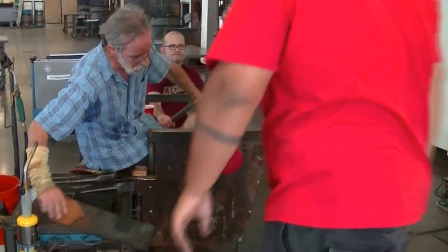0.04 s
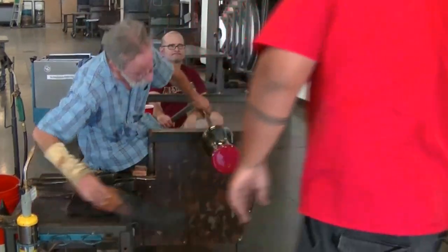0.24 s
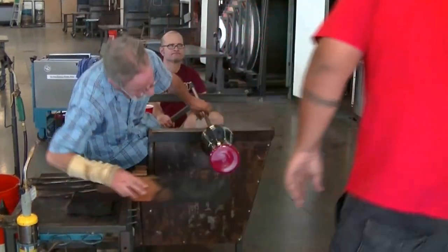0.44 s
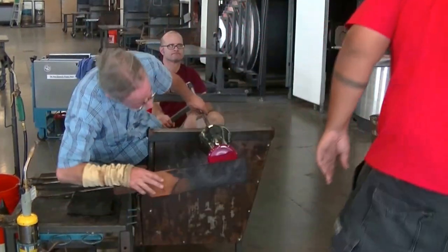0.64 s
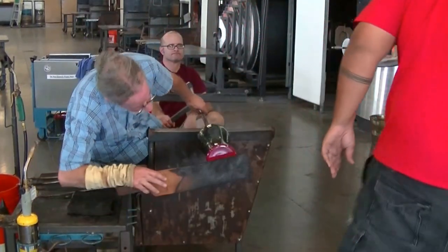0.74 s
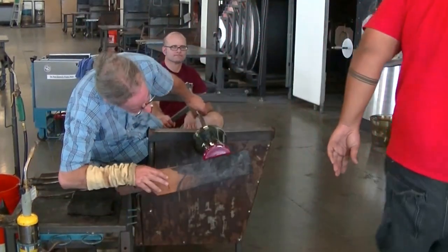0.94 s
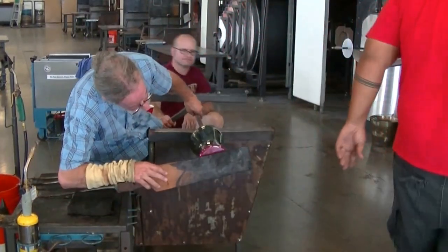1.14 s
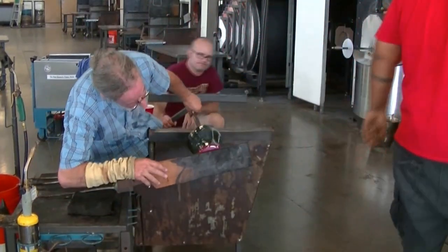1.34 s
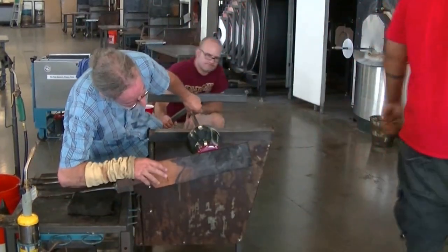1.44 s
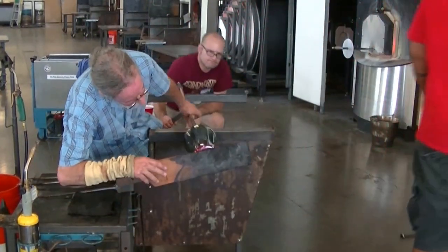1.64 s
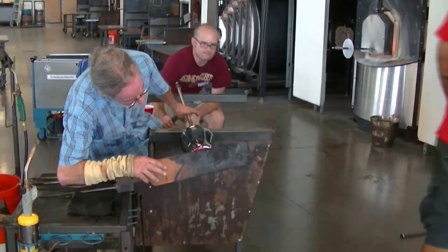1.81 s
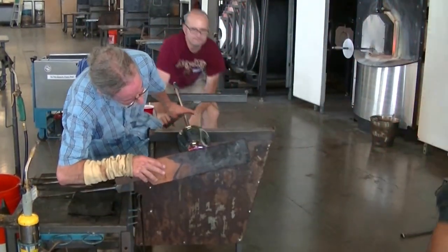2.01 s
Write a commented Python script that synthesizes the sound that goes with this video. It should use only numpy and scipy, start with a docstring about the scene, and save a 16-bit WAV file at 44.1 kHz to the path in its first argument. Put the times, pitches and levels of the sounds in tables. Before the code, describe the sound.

Steady roaring, hissing gas burners in a glassblowing workshop, with faint steel ticks and a dull knock

```python
"""After a short silence the roar of a glass furnace and a reheating drum in a large hard-floored workshop
starts abruptly: flames rumble and gas jets hiss (shaped noise), with whistles (resonant noise) and
blower hums (narrow noise, wavering sines). An earlier steel clink fades at once (decaying noise);
a steel tool ticks faintly (noise bursts), a faint low tone rises and fades (wavering sine),
with a dull knock during it (damped sines), then comes a fainter tick."""
import sys
import numpy as np
from scipy import signal
from scipy.fft import rfft, irfft, next_fast_len
from scipy.io import wavfile

SR = 44100
rng = np.random.default_rng(int(sys.argv[2]) if len(sys.argv) > 2 else 0)


def to_wav(s):
    """Save 16-bit WAV."""
    ch = np.atleast_2d(s).T  # columns
    pcm = np.round(np.clip(ch, -1, 1) * 32767)  # PCM
    wavfile.write(sys.argv[1], SR, pcm.astype(np.int16))


def undo_db(level):
    """Turn decibels back into plain size, where 20 dB means ten times bigger."""
    steps = np.asarray(level, float) / 20
    return 10 ** steps


N = 91331
START_S = 0.0452


def rms_one(x):
    """Scale to rms 1."""
    return x / np.sqrt(np.mean(x ** 2) + 1e-20)


def at_hz(points, hz):
    """Interpolate a (Hz, dB) table on a log-frequency axis."""
    point_hz, point_db = np.array(points, float).T
    return np.interp(np.log(np.maximum(hz, 1)), np.log(np.maximum(point_hz, 1)), point_db)


def shaped(x, points, share=1):
    """Filter by a (Hz, dB) table whose dB are multiplied by share."""
    fft_size = next_fast_len(N)
    gain = undo_db(share * at_hz(points, np.fft.rfftfreq(fft_size, 1 / SR)))
    return irfft(rfft(x, fft_size) * gain, fft_size)[..., :N]


def drift(corner_hz):
    """Slow random curve, rms 1: noise through two equal poles, computed every 40 samples."""
    hop = 40
    r = np.exp(-2 * np.pi * corner_hz * hop / SR)
    noise = rng.standard_normal(N // hop + 2002)
    slow = signal.lfilter([1], [1, -2 * r, r * r], noise)[2000:]  # settled part
    return np.interp(np.arange(N) / hop, np.arange(len(slow)), rms_one(slow))


def resonance(x, hz, width_hz):
    """Two-pole resonance, gain 1 on top."""
    r = np.exp(-np.pi * width_hz / SR)
    zeros = np.array([1, 0, -1]) * (1 - r * r) / 2
    poles = [1, -2 * r * np.cos(2 * np.pi * hz / SR), r * r]
    return signal.lfilter(zeros, poles, x)


def narrow_noise(hz, width_hz):
    """Noise twice through a narrow resonance, rms 1, build-up discarded."""
    noise = rng.standard_normal(N + SR)
    return rms_one(resonance(resonance(noise, hz, width_hz), hz, width_hz)[SR:])


def wavering(hz, db, waver_hz, waver_db):
    """Sine whose pitch and level wander; db is its rms level before the wander."""
    phase = 2 * np.pi * np.cumsum(hz + waver_hz * drift(6.05)) / SR
    return np.sqrt(2) * undo_db(db + waver_db * drift(8.4)) * np.sin(phase)


def dying(start_s, t60_s):
    """Envelope that starts at start_s and falls 60 dB in t60_s."""
    t = np.arange(N) / SR - start_s
    return (t >= 0) * undo_db(-60 * np.maximum(t, 0) / t60_s)


def turbulence(spectrum, flicker_db, flicker_hz):
    """Central and diffuse noise in octave bands, each with its own level drift; centre rms 1."""
    # diffuse part against central part: hz, ratio_db
    diffuse_ratio = [(60,-11), (99,-17), (160,-24), (270,-24.5), (450,-22), (600,-13.5), (740,-19.5),
                     (1220,-12), (2010,-10.5), (3330,-8), (4500,-11.5), (5500,-6), (7000,-6), (9080,-8),
                     (12000,-0.5), (15000,1)]
    fft_size = next_fast_len(N)
    hz = np.maximum(np.fft.rfftfreq(fft_size, 1 / SR), 1)
    coloured = rfft(rng.standard_normal((2, fft_size))) * undo_db(at_hz(spectrum, hz))
    coloured[1] *= undo_db(at_hz(diffuse_ratio, hz))
    octave = np.clip(np.log2(hz / 60), 0, 8)
    total = 0
    for k in range(9):
        share = np.cos(np.pi / 2 * np.clip(octave - k, -1, 1)) ** 2
        band = irfft(coloured * share, fft_size)[:, :N]
        total = total + band * undo_db(flicker_db * drift(flicker_hz))
    mid, side = total / np.sqrt(np.mean(total[0] ** 2))
    return np.array([mid + side, mid - side])


def flames():
    """Combustion roar in the fire chambers: low noise following the vigour of the flames."""
    # roar colour before scaling to rms: hz, density_db_per_hz
    roar_spectrum = [(18,-30), (30,-23), (59,-31), (75,-33), (106,-25.5), (128,-9), (184,-8), (230,-2.5),
                     (282,-1.5), (335,-2), (420,-1.5), (500,-6.5), (573,-14), (660,-11), (737,-13),
                     (876,-8.5), (1300,-17.5), (1690,-21), (2860,-120)]
    # vigour of the flames: time_s, relative_db
    vigour = [(.05, 1), (.2, -1.5), (.3, 1.5), (.5, -1), (.75, 0.5), (1.0, 0), (1.25, 1), (1.45, 0),
              (1.7, 0), (1.9, 0), (2.07, -0.5)]
    roar_db = -36.5
    time_s, vigour_db = np.transpose(vigour)
    gain = undo_db(roar_db + np.interp(np.arange(N) / SR, time_s, vigour_db))
    return gain * turbulence(roar_spectrum, flicker_db=0.0, flicker_hz=6.2)


def jets():
    """Turbulent gas and air jets: broad hiss, plus nozzle whistles as noise in resonances."""
    # hiss colour before scaling to rms: hz, density_db_per_hz
    hiss_spectrum = [(590,-38), (1000,-11), (1280,-10.5), (1430,-5.5), (1910,-1.5), (2180,-2), (2590,0),
                     (2780,-4), (2940,-1.5), (3500,-2), (4500,-3.5), (5300,-5), (5800,-10), (6900,-13),
                     (8360,-24), (9380,-24), (10800,-34), (13000,-42.5), (15000,-41.5), (15750,-37),
                     (15900,-80)]
    # nozzle whistles: hz, width_hz of each of two passes, rms_db, left_right_correlation (0-1)
    whistles = [(2958, 280, -39.5, 0.47), (7800, 90, -63, .6), (8800, 160, -67, .6)]
    hiss_db = -29.5
    out = undo_db(hiss_db) * turbulence(hiss_spectrum, flicker_db=0.43, flicker_hz=8.0)
    for hz, width_hz, db, alike in whistles:
        noise = rng.standard_normal((2, N))
        mid, side = resonance(resonance(noise, hz, width_hz), hz, width_hz)
        stereo = np.sqrt(1 + alike) * mid + np.sqrt(1 - alike) * side * [[1], [-1]]
        out += undo_db(db) * rms_one(stereo)
    return out


def hums():
    """Blower and chamber tones: noise in narrow resonances."""
    # tones: hz, width_hz of each of two passes, rms_db
    tones = [(143, 11.7, -57), (796, 6.1, -57)]
    return sum(undo_db(db) * narrow_noise(hz, width_hz) for hz, width_hz, db in tones)


def blowers():
    """Two stronger blower tones: wavering sines that swell and sink."""
    # levels before the waver: time_s, lower_rms_db, upper_rms_db
    swells = [(.05, -50, -61), (.25, -48.5, -42), (.45, -42, -47.5), (.65, -47.5, -41.5), (.9, -43.5, -47),
              (1.15, -41.5, -52), (1.4, -56, -41), (1.6, -46, -41.5), (1.8, -42.5, -41.5),
              (2.07, -42, -41.5)]
    # lower and upper tone: hz, pitch_wander_hz
    pitches = [(277, 4.07), (436.5, 1.04)]
    t = np.arange(N) / SR
    time_s, *tone_levels_db = np.transpose(swells)
    out = 0
    for (hz, waver_hz), db in zip(pitches, tone_levels_db):
        out = out + wavering(hz, np.interp(t, time_s, db), waver_hz, waver_db=2.5)
    return out


def fading_clink():
    """Rest of an earlier steel clink: bright noise decaying from the start."""
    # clink colour before scaling to rms: hz, density_db_per_hz
    clink_spectrum = [(4000, -18), (5100, 4), (6000, -2.5), (7100, 1.5), (8200, -11.5), (9000, -5),
                      (10500, -20), (12500, -22), (15700, -33)]
    clink_db, t60_s, side_share = -33.5, 0.45, 0.47
    mid, side = rms_one(shaped(rng.standard_normal((2, N)), clink_spectrum))
    return undo_db(clink_db) * dying(START_S, t60_s) * (mid + side_share * side * [[1], [-1]])


def ticks():
    """Steel tool touches: bright noise crack, a bounce and a tail from the hall."""
    # touches: start_s, crack_db
    touches = [(0.3594, -40), (1.83, -56)]
    # tick colour before scaling to rms: hz, density_db_per_hz
    tick_spectrum = [(5000, -34), (7000, 5), (8200, -6), (9300, 3.5), (10200, -5.5), (12000, -16),
                     (15500, -28)]
    bounce_s, bounce_db = 0.008, -4  # after and relative to the touch
    crack_t60_s, tail_t60_s, tail_db = 0.027, 0.45, -5.5  # tail relative to the touch
    crack, tail = 0, 0
    for start_s, db in touches:
        bounce = undo_db(bounce_db) * dying(start_s + bounce_s, crack_t60_s)
        crack = crack + undo_db(db) * (dying(start_s, crack_t60_s) + bounce)
        tail = tail + undo_db(db + tail_db) * dying(start_s, tail_t60_s)
    noise = rms_one(shaped(rng.standard_normal((3, N)), tick_spectrum))
    tail_noise = (noise[1:] + noise[0]) / np.sqrt(2)  # half shared by left and right
    return crack * noise[0] + tail * tail_noise


def rising_tone():
    """Faint low tone that rises and fades: a wavering sine."""
    # course before the waver: time_s, pitch_hz, rms_db
    course = [(.5, 325, -60), (.65, 333, -43), (.8, 347, -41), (1.0, 351, -42), (1.07, 386, -41),
              (1.2, 380, -45), (1.3, 375, -60)]
    t = np.arange(N) / SR
    time_s, hz, db = np.transpose(course)
    pitch_hz = np.interp(t, time_s, hz)
    return wavering(pitch_hz, np.interp(t, time_s, db, -120, -120), waver_hz=5.0, waver_db=3.0)


def knock():
    """One faint dull knock: short damped sine modes."""
    # modes: hz, peak_db, t60_s
    modes = [(1950, -25, .05), (1480, -29, .06)]
    start_s = 0.834
    t = np.arange(N) / SR - start_s
    return sum(undo_db(db) * dying(start_s, t60_s) * np.sin(2 * np.pi * hz * t) for hz, db, t60_s in modes)


def scene():
    """All sources together."""
    steady = flames() + jets() + hums() + blowers()
    return steady + fading_clink() + ticks() + rising_tone() + knock()


def band_limit(x):
    """A steep low-pass at the top of the band."""
    return signal.sosfilt(signal.butter(12, 16460, fs=SR, output="sos"), x)


def record(dry):
    """Two microphones of different colour; silence up to the start; bass and treble cut."""
    # colour of left against right, before the shares below: hz, lean_db
    lean = [(60,-1.5), (200,0), (1220,0.0), (2400,-0.5), (3330,1.5), (4400,-4), (5500,-2), (7000,3),
            (8200,-0.5), (10000,-5), (15000,2)]
    bass_cut_hz, treble_stop_hz = 77, 16050
    x = np.array([shaped(dry[0], lean, share=0.5), shaped(dry[1], lean, share=-0.43)])
    x = x * (np.arange(N) >= START_S * SR)
    x = signal.sosfilt(signal.butter(2, bass_cut_hz, "high", fs=SR, output="sos"), x)
    x = signal.sosfilt(signal.cheby2(12, 50, treble_stop_hz, fs=SR, output="sos"), x)
    return band_limit(x)


dry = scene()
out = record(dry)
to_wav(out)
```